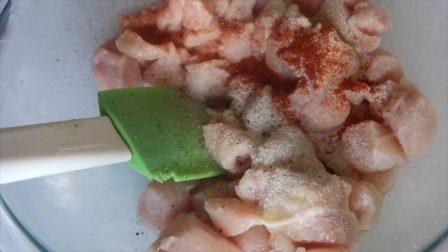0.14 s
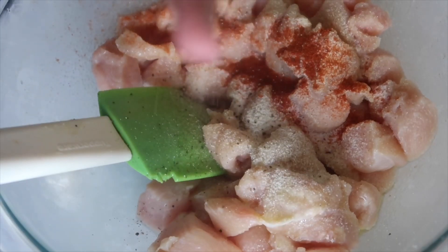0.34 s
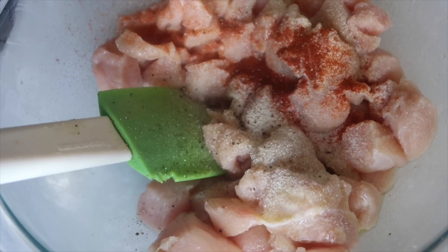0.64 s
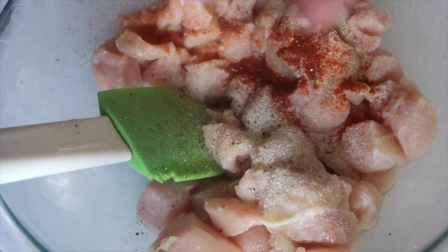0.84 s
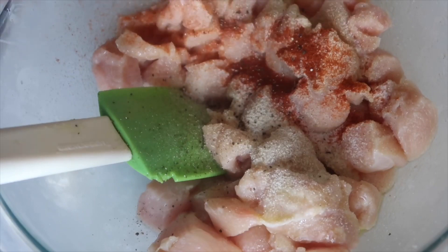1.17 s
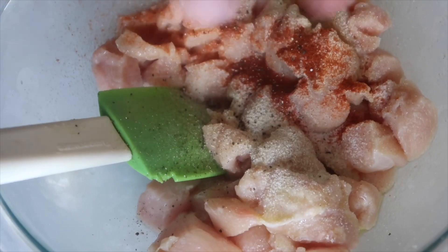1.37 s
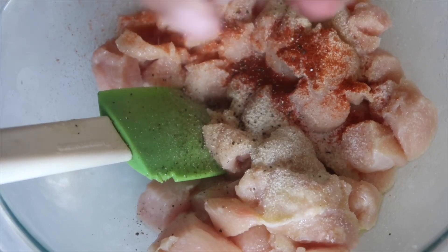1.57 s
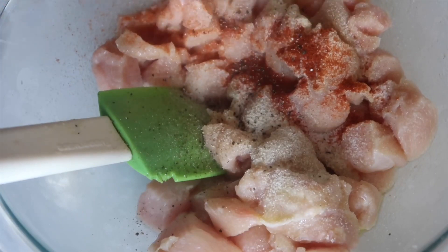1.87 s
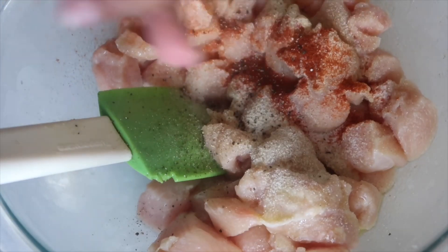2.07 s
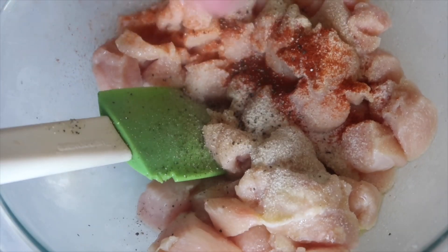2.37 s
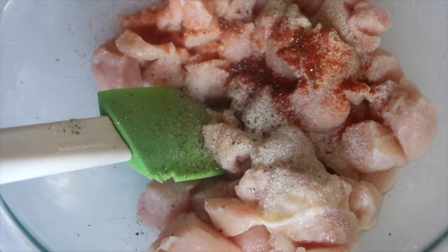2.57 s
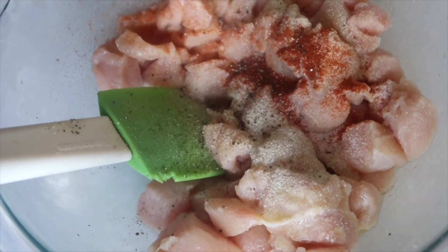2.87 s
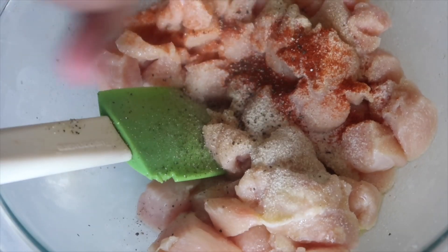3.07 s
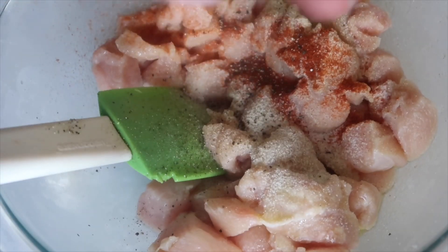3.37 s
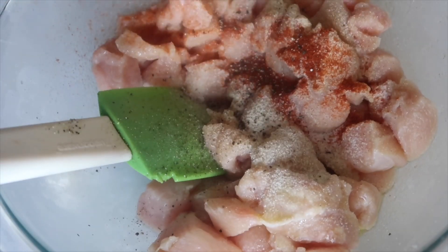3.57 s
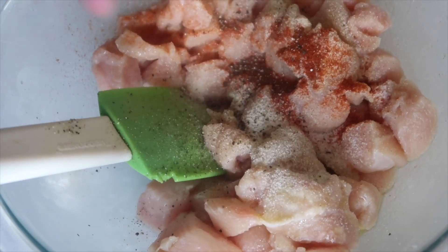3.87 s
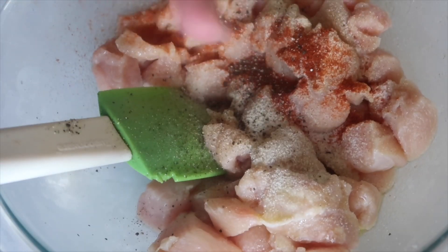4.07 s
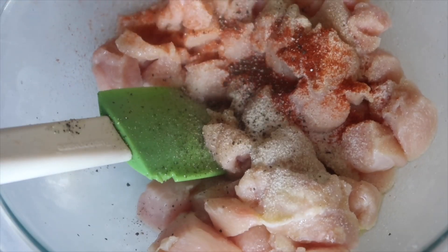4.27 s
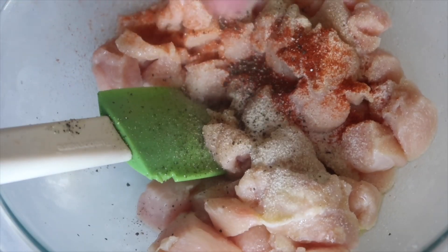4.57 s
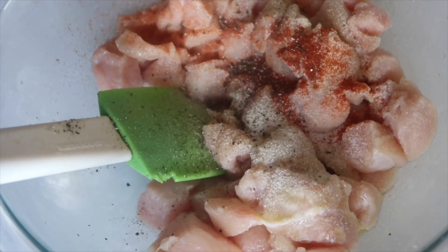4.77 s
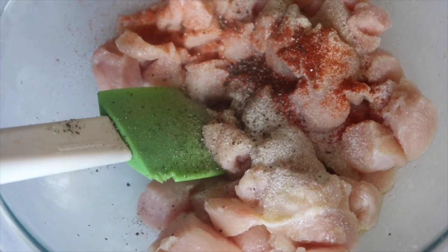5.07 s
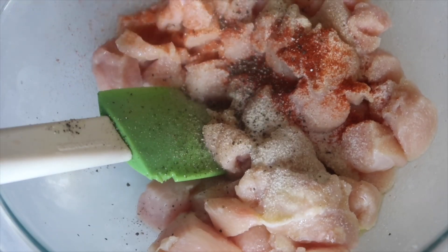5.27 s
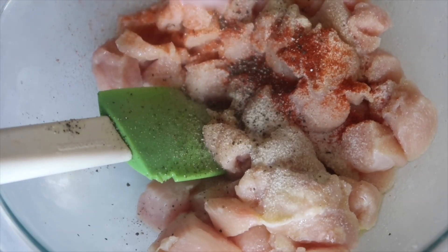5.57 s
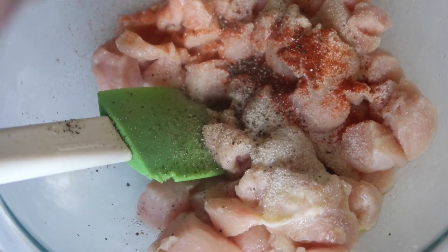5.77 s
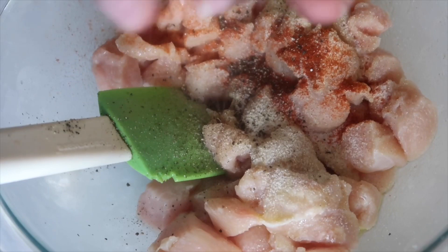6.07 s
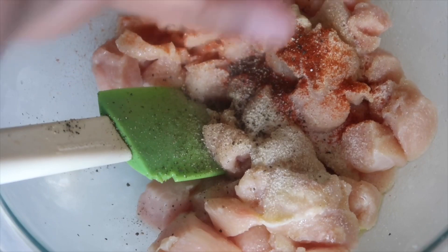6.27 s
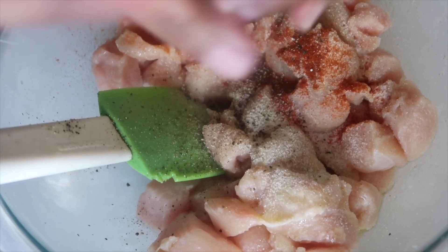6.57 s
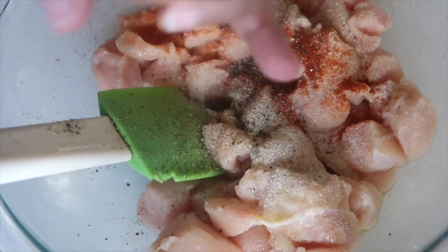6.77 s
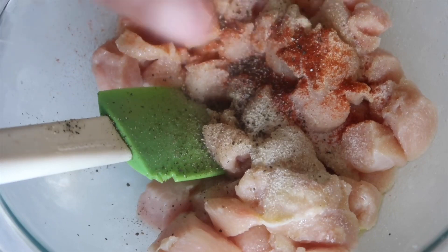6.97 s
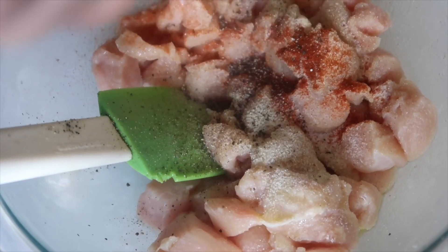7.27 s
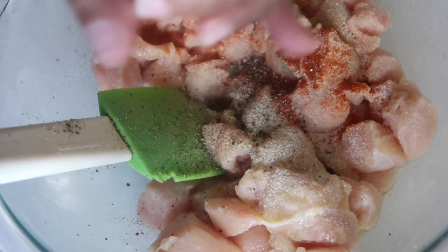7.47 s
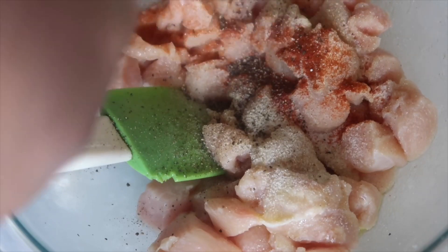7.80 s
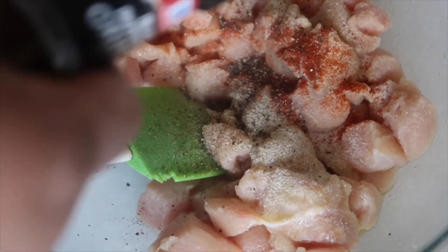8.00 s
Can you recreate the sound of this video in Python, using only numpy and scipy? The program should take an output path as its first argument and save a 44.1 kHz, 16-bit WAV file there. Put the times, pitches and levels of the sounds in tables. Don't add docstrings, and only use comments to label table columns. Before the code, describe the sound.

Close, gritty pepper grinding in separate hard twists and faint turns back, the hollow mill body ringing briefly in a small quiet kitchen.

```python
import sys
import numpy as np
from scipy import signal
from scipy.fft import rfft, irfft, next_fast_len
from scipy.io import wavfile

SR = 44100
rng = np.random.default_rng(int(sys.argv[2]) if len(sys.argv) > 2 else 0)


def dump(signal):
    limited = np.clip(np.atleast_2d(signal).T, -1, 1)
    pcm = np.round(limited * 32767).astype(np.int16)
    wavfile.write(sys.argv[1], SR, pcm)


def invert_db(x):
    u = np.asarray(x, float) / 20
    return 10 ** u


N = 358974

# full force from second, held for seconds, crumble level in dB,
# wind-up in seconds, hopper knock relative to crumble in dB.
TWISTS = [(0.0, 0.023, -27.5, 0.054, -16), (0.473, 0.13, -25.5, 0.11, -17),
          (1.008, 0.099, -27, 0.064, -9.5), (1.06, 0.09, -29, 0.23, -27), (1.612, 0.05, -21.5, 0.093, -9),
          (2.503, .11, -22, 0.2, -20.5), (3.301, 0.039, -34, 0.085, -17), (3.397, 0.14, -27.5, 0.11, -14),
          (4.103, 0.13, -24, 0.13, -14.5), (4.739, 0.13, -24, 0.051, -16), (5.478, 0.037, -31.5, 0.15, -15),
          (5.569, .11, -24, 0.24, -15.5), (6.203, 0.098, -22, 0.11, -12.5), (6.9, 0.042, -27.5, 0.11, -16),
          (6.973, 0.11, -21.5, 0.03, -22.5), (7.568, 0.099, -21, 0.076, -11.5)]
REGRIPS = [(.15, 0.08, -41, 0.11, -12.5), (.74, 0.075, -38, 0.21, -15), (1.3, 0.059, -33.5, 0.24, -16),
           (1.897, 0.083, -39, 0.32, -9.5), (3.711, 0.084, -38, 0.35, -14),
           (4.421, 0.066, -40, 0.26, -13.5), (5.052, 0.059, -29.5, 0.17, -13.5),
           (5.858, 0.1, -39, 0.29, -11.5), (6.501, 0.05, -34.5, 0.15, -11), (7.24, 0.034, -38, 0.1, -30),
           (7.34, 0.052, -34.5, 0.24, -7), (1.41, 0.021, -44.5, 0.11, -14),
           (3.649, 0.059, -40.5, 0.06, -17)]
WIND_UP_DB, ARCH_DB = 46, 3
TWIST_FALL_DB_PER_S, REGRIP_FALL_DB_PER_S = 423, 188
SETTLE_DB, SETTLE_FALL_DB_PER_S, SETTLE_DULL_DB = -13, 115, -2
TWIST_GRIT_DB, REGRIP_GRIT_DB = -4.5, -7.5
GRIT_LAG_S = 0.0026
IDLE_DB, IDLE_GRIT_DB, IDLE_KNOCK_DB = -67, 1.5, -18.5

# start in seconds, peak level in dB, splinter share in dB,
# favoured shell pitch in Hz.
SPLITS = [(.4818, -3, -13, 1410), (.5172, -5.5, -15, 1850), (.5506, -1.2, -18, 1580),
          (1.0408, -7, -11, 2000), (1.0725, -13.5, -0.5, 2030), (1.0914, -5, -11.5, 1950),
          (1.1468, -1.5, -23, 1780), (1.6392, -5, -13, 1990), (1.6571, -12, 2.5, 2300),
          (1.6726, 2, -11, 2060), (2.5112, -3, -34, 2620), (2.5421, 5, -14, 2950), (2.609, 1, -16.5, 2394),
          (3.3762, -4, -11, 2800), (3.4116, 0, -11, 1430), (4.1789, -2.5, -12, 1860),
          (4.2004, -2.5, -10, 2830), (4.2438, 0, -10.5, 2900), (4.8509, -8.5, -29, 1400),
          (5.6101, -2.5, -6.5, 2020), (5.6162, -2, -8.5, 2870), (5.6241, -7.5, -18, 2290),
          (6.2517, -0.5, -8, 3080), (6.9775, -3, -17, 2180), (7.0025, 1.5, -12, 2490),
          (7.0663, -1, -40, 1630), (7.0868, -6, -33, 1570), (7.1087, -5.5, -13.5, 2200),
          (7.6201, -5.5, -30, 1760), (7.662, -6.5, -5, 2200)]
CHIPS = [(0.0162, -9, -5.5, 1500), (0.4756, -10, -6.5, 2710), (0.532, -10, -29, 2870),
         (0.5992, -10.5, -6, 1750), (1.005, -10, -34, 2020), (1.0224, -7, -13, 2240),
         (1.1309, -10.5, -39, 2000), (1.1723, -14.5, -16, 1560), (1.6083, -16, -5, 2000),
         (2.457, -18.5, -5.5, 2630), (2.4818, -11.5, -24, 2870), (3.3354, -9.5, -3.5, 1900),
         (3.4857, -11.5, -21, 3230), (4.1025, -10.5, -11, 2080), (4.137, -11.5, -3, 3350),
         (4.1512, -5.5, -18, 2770), (4.7386, -14.5, -10, 2620), (4.7518, -13.5, -5, 1860),
         (4.787, -14, -1, 2620), (5.5038, -16, -8.5, 2790), (5.53, -12, -9.5, 2850),
         (5.5573, -11.5, -9, 2300), (5.5852, -9.5, -9, 2000), (5.6375, -4, -16, 1890),
         (6.1886, -7.5, -15.5, 3300), (6.2308, -10, -14, 2010), (6.9189, -8.5, -7.5, 1760),
         (6.9359, -8.5, -8, 1970), (7.5624, -12, -14, 2000), (7.7142, -11.5, -7.5, 1880)]
TICKS = [(0.451, -24, -33, 2760), (0.72, -22.5, -10, 1610), (.7572, -23, -25, 2970),
         (.9877, -26, -13, 2020), (1.2978, -18, -11, 1960), (1.3508, -17.5, -9, 2000),
         (1.735, -17, -4.5, 3450), (1.915, -18.5, -25, 1980), (1.9875, -18, -7, 1730),
         (2.4185, -25.5, -7, 2550), (3.054, -32, -39, 2250), (3.2979, -17, -12, 1925),
         (3.7941, -10, -16, 3000), (4.027, -30.5, -20, 1930), (4.0583, -20.5, -33, 2440),
         (4.427, -21.5, -29, 2740), (4.649, -28, -23.5, 2970), (5.0225, -19, -19, 1720),
         (5.0556, -18.5, -24.5, 2000), (5.473, -24, -10.5, 2420), (5.8701, -21, -21, 2190),
         (5.948, -28, -32, 2000), (6.1494, -24, -10.5, 2940), (6.4412, -27.5, -12.5, 1620),
         (6.5251, -17.5, -18, 2240), (6.5784, -19.5, -14.5, 2280), (6.8805, -22, -10.5, 1580),
         (7.2392, -18.5, -21, 1710), (7.4106, -17.5, -20, 2100), (7.5233, -23.5, -10.5, 3200)]
SCRAPS = [(0.4715, -10, -12, 1920), (1.052, -9.5, -3.5, 2080), (1.0684, -11, -29, 2030),
          (3.4239, -6.5, -9, 2000), (6.339, -20, -7.5, 1580), (7.5557, -13, -21.5, 1570),
          (1.615, -11, -19, 2000), (2.632, -35, -26, 1995), (3.4447, -16.5, -8, 1970),
          (3.5256, -14, -6, 1700), (4.2167, -16, 2, 3320), (4.6995, -30, -13, 2580),
          (4.8736, -14, -35, 1610), (5.0735, -26, -13, 2280), (5.657, -17, -20, 2200),
          (5.6887, -16, -16, 2010), (6.8993, -23, -36, 2710), (7.2492, -17, -29, 1480),
          (7.3358, -27, -7, 2100), (7.5778, -6, -9.5, 1760), (8.0318, -42, -4.5, 1930),
          (.5933, -17, -11, 1400), (1.0314, -10, -12.5, 2000), (1.0385, -4, -15, 2000),
          (1.0647, -12, -20, 2000), (1.3102, -18, -19, 1740), (1.3418, -20, -27, 1540),
          (1.8815, -25, -18, 2000), (1.8901, -27, -12, 2000), (1.9769, -24, -15, 2000),
          (2.4733, -13, -24, 2820), (2.4853, -16, -22, 2930), (2.5195, -12, -10, 2600),
          (2.5336, -13, -21, 2190), (2.5585, -20, -4, 2300), (2.5813, -21, -10, 1670),
          (2.5982, -4, -25, 1650), (3.3155, -16, -30, 2570), (3.4009, -27, 1, 3010),
          (3.5018, -13.5, -10, 3200), (3.5337, -30, -21, 1800), (3.7567, -29, -14, 2290),
          (4.08, -27, -26, 1910), (4.0971, -22, -24, 2760), (4.169, -4.5, -8.5, 1400),
          (4.7669, -16, -15, 1940), (4.8042, -27.5, -3, 1560), (5.0359, -26, -20, 1570),
          (5.4869, -31, -11, 2830), (5.5634, -11, -14, 2200), (5.5711, -10, -15, 2850),
          (5.9412, -28, -24, 1780), (6.2454, -12, -19, 3250), (6.2635, -16.5, -5, 1910),
          (6.2788, -21, -23, 2300), (6.5849, -27, -18, 2270), (6.9718, -9, -17, 2200),
          (7.0105, -4.5, -12.5, 2700), (7.023, -5.5, -18, 1540), (7.0507, -9, -15, 1550),
          (7.0604, -12, -17, 1590), (7.2702, -22, -27, 1700), (7.5859, -16, -11, 1860),
          (7.5991, -10, -22, 1940), (7.6975, -31, -22, 1576), (.489, -11, -6, 2900),
          (4.1065, -12, -8, 1660), (4.1105, -20.5, -7, 1900), (.4455, -25, -21, 2700)]
CRACKS = SPLITS + CHIPS + TICKS + SCRAPS
CRACK_S, CRACK_DB, SPLINTER_DB, PITCH_HZ = np.transpose(CRACKS)

# pitch in Hz, width in Hz, level in dB.
BODY_TONES = [(1400, 110, -4), (1544, 113, 2), (1760, 130, -2), (2000, 75, 1), (2280, 110, 0),
              (2620, 83, -2.5), (2870, 130, -1), (3250, 98, -6.5)]
# pitch in Hz, width in Hz, level in dB.
HOPPER_TONES = [(643, 84, -4), (730, 110, -9.5), (865, 120, -7.5), (430, 150, -14.5), (1085, 100, -5)]
# frequency in Hz, level in dB per Hz.
GRIT_COLOUR = [(1760, -11), (3000, -4.5), (3060, 2), (3550, 3), (4260, 2.5), (4630, 1.5), (5040, 0.8),
               (5750, -0.5), (7670, 0), (11300, -5.5), (16000, -14)]
# frequency in Hz, side minus mid in dB.
GRIT_SIDE = [(1000, -23.5), (3000, -18), (4400, -6.5), (6000, -2), (8100, 0), (12000, 3), (16000, -10)]

# start in seconds, held for seconds, thud level in dB.
HEAVES = [(.01, 0.014, -50), (.48, 0.13, -45.5), (1.16, 0.013, -53), (1.64, .03, -61), (1.92, .03, -50),
          (2.53, 0.019, -40), (3.41, 0.011, -38), (3.5, 0.016, -51), (3.72, 0.088, -55), (4.16, 0.034, -36),
          (4.8, 0.071, -45.5), (5.07, 0.044, -53), (5.6, 0.06, -44.5), (6.25, .02, -46.5),
          (6.97, 0.076, -43), (7.36, 0.019, -50)]
HEAVE_RISE_S, HEAVE_FALL_DB_PER_S = 0.21, 254.5
# time in seconds, thud level in dB.
GRIP = [(0, -71), (1, -60.5), (2.2, -60), (2.9, -66.5), (4, -59), (4.6, -65), (5.3, -55.5), (8.14, -57.5)]
# frequency in Hz, level in dB per Hz.
THUD_COLOUR = [(24, -47), (40, -6.5), (113, 0.5), (231, -9), (360, -8), (400, -10), (520, -30.5),
               (880, -120)]
# start in seconds, held for seconds, level in dB.
RUSTLES = [(2.07, 0.037, -62), (2.33, .06, -71), (2.885, 0.012, -45), (2.97, 0.038, -56), (5.3, 0.055, -64),
           (5.42, .04, -66), (6.66, 0.11, -57), (6.74, 0.017, -54.5), (6.841, 0.015, -64),
           (7.87, 0.11, -85), (8.03, 0.1, -56.5)]
RUSTLE_RISE_S, RUSTLE_FALL_DB_PER_S = 0.091, 308
# frequency in Hz, level in dB per Hz.
RUSTLE_COLOUR = [(1200, -11), (2400, 1.5), (5000, -14.5), (8700, -1), (11500, -4.5), (15000, -20.5)]

# frequency in Hz, time to die by 60 dB in seconds.
KITCHEN_DECAY = [(300, 0.28), (900, 0.12), (1400, 0.26), (2300, 0.25), (3500, 0.17), (12000, 0.21)]
# frequency in Hz, level in dB per Hz.
AIR_COLOUR = [(12, -42), (20, 0.5), (110, 3), (234, -6.5), (377, -1.5), (849, -7), (2080, -12.5),
              (2260, -11.5), (3950, -16.5), (6910, -21), (8650, -23), (11800, -25), (13500, -23),
              (16000, -63.5)]
AIR_DB = -58.5
# frequency in Hz, side minus mid in dB.
AIR_SIDE = [(60, -27), (120, -14), (200, 4.5), (350, -1), (8000, -0.5), (15000, 5.5)]
# centre in seconds, half width in seconds, gain in dB.
LULLS = [
    (0.369, 0.042, -5.5),
    (2.841, 0.16, -3.5),
    (3.169, 0.085, -4),
    (4.58, 0.1, -2.5),
    (6.09, 0.028, -1),
    (6.811, 0.02, 0.5),
    (7.95, .06, -2),
]


def turning():
    crumble = invert_db(2 * IDLE_DB)
    scratch = crumble * invert_db(2 * IDLE_GRIT_DB)
    knock = crumble * invert_db(2 * IDLE_KNOCK_DB)
    for s, held, db, rise, knock_db in TWISTS:
        settle = stroke(s, held, db + SETTLE_DB, rise, SETTLE_FALL_DB_PER_S)
        force = stroke(s, held, db, rise, TWIST_FALL_DB_PER_S) + settle
        late = stroke(s + GRIT_LAG_S, held - GRIT_LAG_S, db, rise, TWIST_FALL_DB_PER_S)
        late = late + settle * invert_db(2 * SETTLE_DULL_DB)
        crumble = crumble + force
        scratch = scratch + late * invert_db(2 * TWIST_GRIT_DB)
        knock = knock + force * invert_db(2 * knock_db)
    for s, held, db, rise, knock_db in REGRIPS:
        force = stroke(s, held, db, rise, REGRIP_FALL_DB_PER_S)
        crumble = crumble + force
        scratch = scratch + force * invert_db(2 * REGRIP_GRIT_DB)
        knock = knock + force * invert_db(2 * knock_db)
    return 10 * np.log10([crumble, scratch, knock / crumble])


def stroke(start_s, held_s, level_db, rise_s, fall_db_per_s):
    t = np.arange(N) / SR - start_s
    edge = np.clip(2 * t / max(held_s, 1e-3) - 1, -1, 1)
    arch_db = ARCH_DB * edge ** 2
    wind_up_db = WIND_UP_DB * np.maximum(-t, 0) / rise_s
    fall_db = fall_db_per_s * np.maximum(t - held_s, 0)
    return invert_db(2 * (level_db - arch_db - wind_up_db - fall_db))


def body(crumble_db, knock_db):
    shell_db = CRACK_DB + 10 * np.log10(np.clip(1 - invert_db(2 * SPLINTER_DB), .05, 1))
    crumbs = grains(per_s=1000, spread_db=5, clump_db=1.8)
    shell = strike(BODY_TONES, crumbs * invert_db(crumble_db + .6), shell_db - 4.0,
                   favour_db=10.0, grip_damping=3.0)
    hopper_crumbs = crumbs * invert_db(crumble_db + knock_db + 13.0)
    hopper_db = shell_db + knock_db[(CRACK_S * SR).astype(int)] - 8
    hopper = strike(HOPPER_TONES, hopper_crumbs, hopper_db, favour_db=1.5, grip_damping=1.73)
    return band_pass(shell, 5, 1270, 4000) + band_pass(hopper, 2, 350, 1100)


def strike(modes, crumbs, peaks_db, favour_db, grip_damping):
    whims = rng.standard_normal((len(CRACKS), len(modes)))
    times, pitches = np.array(sorted(CRACKS))[:, [0, 3]].T
    leaning_hz = np.interp(np.arange(N) / SR, times, pitches)
    crumble, bursts = 0, 0
    for k, (hz, width_hz, level_db) in enumerate(modes):
        near = np.exp(-(np.log(hz / PITCH_HZ) / .13) ** 2)
        squeezed = (hz, max(width_hz, 90) * grip_damping, 0)
        tears = tearing(rise_s=0.00016, fall_s=0.00059)
        rings = mode(mode(tears, *squeezed), *squeezed)
        share = invert_db(level_db + 1.5 * whims[:, k] + favour_db * near) / np.abs(rings).max(axis=1)
        bursts = bursts + share[:, None] * rings
        lean_db = 0.16 * favour_db * np.exp(-(np.log(hz / leaning_hz) / 0.23) ** 2)
        force = crumbs * invert_db(2.9 * drift(12) + lean_db) * rng.standard_normal(N)
        crumble = crumble + mode(force, hz, width_hz, level_db)
    return crumble + lay(bursts, peaks_db)


def mode(force, hz, width_hz, level_db):
    r = np.exp(-np.pi * width_hz / SR)
    b = invert_db(level_db) * (1 - r * r) * np.array([1, 0, -1])
    return signal.lfilter(b, [1, -2 * r * np.cos(2 * np.pi * hz / SR), r * r], force)


def tearing(rise_s, fall_s, size=1000):
    t = np.arange(size) / SR
    swell = (1 - np.exp(-t / rise_s)) * np.exp(-t / fall_s)
    return swell * rng.standard_normal((len(CRACKS), size))


def lay(bursts, peaks_db):
    size = bursts.shape[1]
    out = np.zeros(N + size)
    at = (CRACK_S[:, None] * SR).astype(int) + np.arange(size)
    gains = invert_db(peaks_db) / np.abs(bursts).max(axis=1)
    np.add.at(out, at, bursts * gains[:, None])
    return out[:N]


def grains(per_s, spread_db, clump_db):
    born = rng.random(N) < per_s / SR
    sizes = invert_db(spread_db * np.minimum(rng.exponential(1, N), 3) + clump_db * drift(36))
    return rms_one(born * sizes * rng.choice([-1, 1], N))


def grit(grit_db):
    scratch = grains(per_s=3000, spread_db=5, clump_db=1.8) * invert_db(grit_db + 2.5)
    tears = tearing(rise_s=.00015, fall_s=.0026)
    splinters = lay(tears, CRACK_DB + SPLINTER_DB + 10.0)
    return scatter(scratch + splinters, GRIT_COLOUR)


def scatter(source, spectrum, count=8):
    t = np.arange(400) / SR
    paths = rng.standard_normal((count, 2, len(t))) * np.exp(-t / .0013)
    paths /= np.linalg.norm(paths, axis=2, keepdims=True)
    turn = np.repeat(rng.integers(0, count, N // 300 + 1), 300)[:N]
    both = np.zeros((2, N))
    for k in range(count):
        both += signal.oaconvolve((source * (turn == k))[None], paths[k], axes=1)[:, :N]
    mid, side = both
    return left_right(colour(mid, spectrum), colour(side, spectrum, GRIT_SIDE))


def wrist():
    power = invert_db(2 * np.interp(np.arange(N) / SR, *np.transpose(GRIP)))
    for row in HEAVES:
        power = power + stroke(*row, HEAVE_RISE_S, HEAVE_FALL_DB_PER_S)
    return 10 * np.log10(power)


def hands(thud_db):
    lumps = rng.standard_normal(N) * invert_db(1.3 * drift(43))
    return invert_db(thud_db) * rms_one(colour(lumps, THUD_COLOUR))


def fingers():
    level = np.sqrt(sum(stroke(*row, RUSTLE_RISE_S, RUSTLE_FALL_DB_PER_S) for row in RUSTLES))
    friction = grains(per_s=6400, spread_db=12.5, clump_db=0.0)
    return scatter(invert_db(3.0) * level * friction, RUSTLE_COLOUR, count=4)


def kitchen(x):
    t = np.arange(int(.5 * SR)) / SR
    tail = np.zeros((2, len(t)))
    for hz in 250 * 2. ** np.arange(0, 6, .5):
        band = band_pass(rng.standard_normal(tail.shape), 2, hz / 2 ** .25, hz * 2 ** .25)
        tail += band * invert_db(-60 * t / at_hz(KITCHEN_DECAY, hz))
    tail *= t > .004
    mid, side = signal.oaconvolve(x[None], tail / np.linalg.norm(tail[0]), axes=1)[:, :N]
    return left_right(mid, invert_db(-13.0) * side)


def air():
    mid = colour(rng.standard_normal(N), AIR_COLOUR)
    side = colour(rng.standard_normal(N), AIR_COLOUR, AIR_SIDE)
    return invert_db(AIR_DB + 0.91 * drift(2.12)) * left_right(mid, side) / mid.std()


def gate():
    t = np.arange(N) / SR
    return invert_db(sum(db * np.exp(-((t - s) / width) ** 2) for s, width, db in LULLS))


def rms_one(x):
    return x / np.sqrt(np.mean(x ** 2) + 1e-20)


def drift(rate):
    r = np.exp(-2 * np.pi * rate / SR)
    wander = signal.lfilter([1], [1, -2 * r, r * r], rng.standard_normal(N + 4000))
    return rms_one(wander[4000:])


def band_pass(x, order, low_hz, high_hz):
    return signal.sosfilt(signal.butter(order, [low_hz, high_hz], "band", fs=SR, output="sos"), x)


def at_hz(points, hz):
    table_hz, values = np.transpose(points)
    return np.interp(np.log(hz + 1), np.log(table_hz), values)


def colour(x, *spectra):
    size = next_fast_len(x.shape[-1] + 4096)
    hz = np.arange(size // 2 + 1) * SR / size
    gain = invert_db(sum(at_hz(s, hz) for s in spectra))
    return irfft(rfft(x, size) * gain, size)[..., :x.shape[-1]]


def left_right(mid, side):
    return np.array([mid + side, mid - side])


def scene():
    crumble_db, grit_db, knock_db = turning()
    shell = body(crumble_db, knock_db)
    off_rim = invert_db(-13.5) * np.pad(shell, (70, 0))[:N]
    mill = left_right(shell, off_rim) + grit(grit_db)
    near = mill + invert_db(-12.5) * kitchen(mill.mean(axis=0)) + fingers()
    to_the_right = invert_db(np.array([[-.3], [.3]]))
    return gate() * (near * to_the_right + hands(wrist()) + air())


def roll_off(x):
    return signal.sosfilt(signal.butter(12, 16300, fs=SR, output="sos"), x)


def record(dry):
    rounded = 1.15 * np.tanh(dry / 1.15)
    return roll_off(rounded)


dry = scene()
out = record(dry)
dump(out)
```